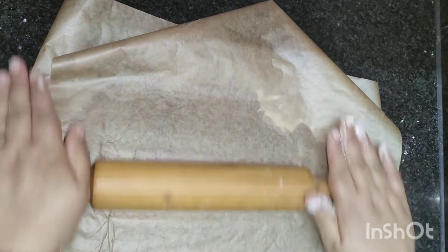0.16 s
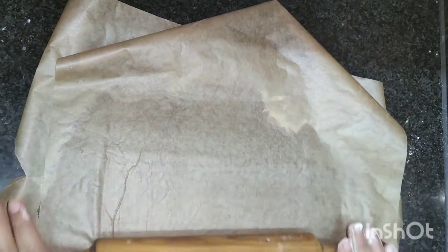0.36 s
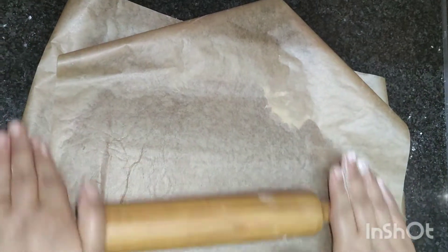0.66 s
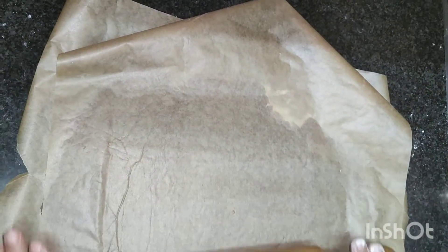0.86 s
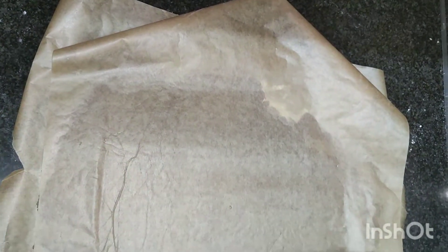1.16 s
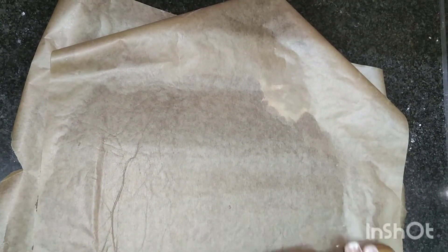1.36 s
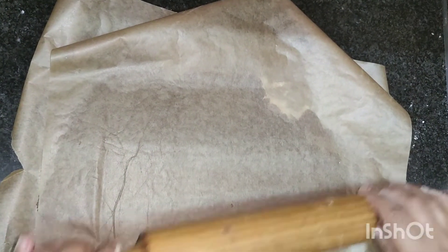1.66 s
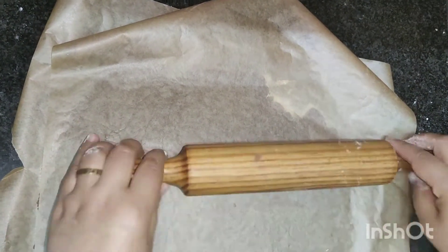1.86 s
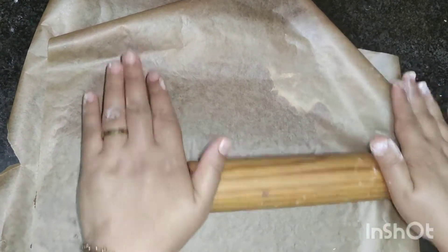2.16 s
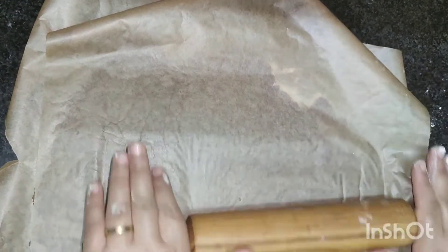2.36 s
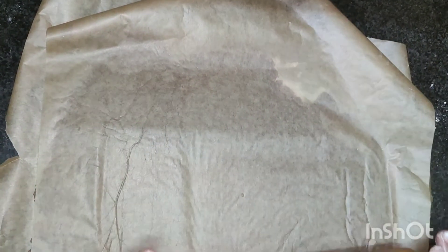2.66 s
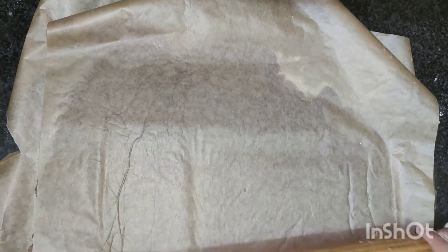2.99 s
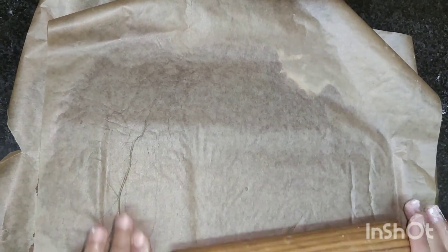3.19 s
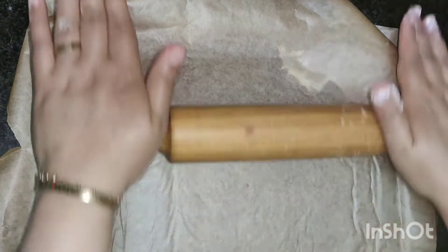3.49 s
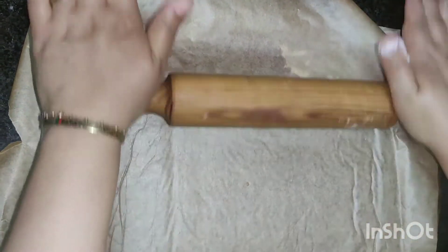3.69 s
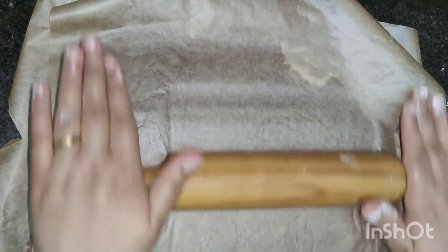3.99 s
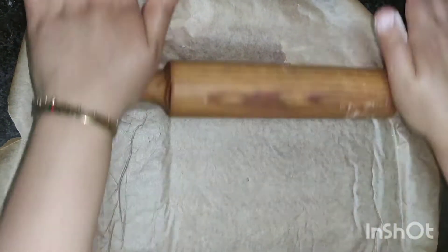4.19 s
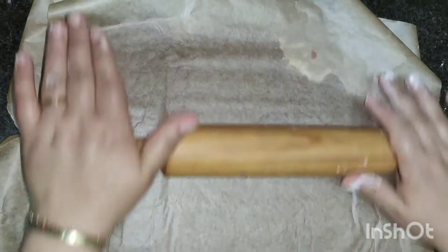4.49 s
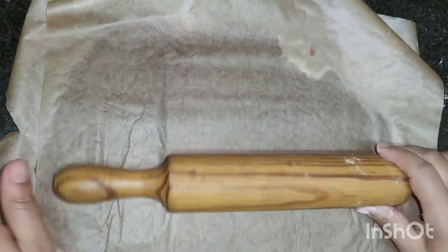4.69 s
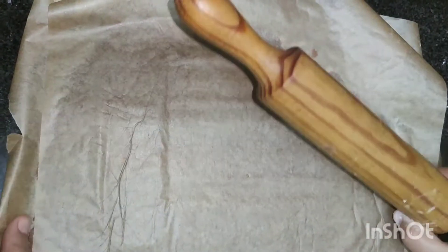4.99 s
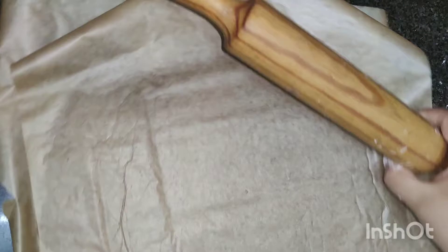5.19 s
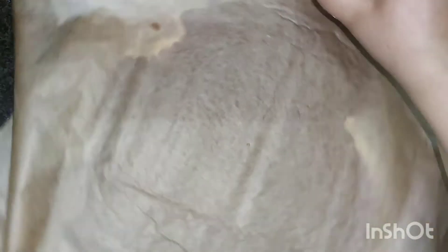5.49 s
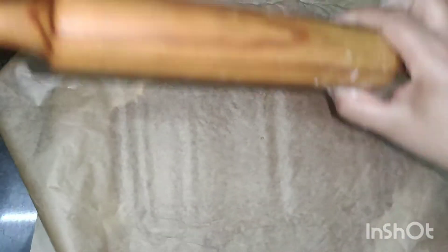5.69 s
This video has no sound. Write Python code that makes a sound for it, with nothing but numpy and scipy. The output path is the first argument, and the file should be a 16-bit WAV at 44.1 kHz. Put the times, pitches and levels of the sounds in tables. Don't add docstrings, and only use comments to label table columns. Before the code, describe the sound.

A wooden rolling pin works over baking paper on a hollow kitchen counter, heard close on a phone's stereo microphones. From 0 to 0.7 s there are only light, dry crackles and thin rustle over a faint low hum. Around 0.8-1.0 s a small cluster of crisp clicks, then sparse ticks until 1.7 s. At 1.9 s a loud sharp crack with a woody pop and dull hollow thud; a softer knock at 2.1 s. From 2.2 to 2.85 s crinkling is dense and bright, with snaps and short rips. At 3.15 s comes a strong low bump, then near quiet. From 3.45 to 4.0 s moderate, duller creasing; at 4.2-4.5 s sharp bursts, and a soft thud at 4.7 s. From 4.9 to 5.6 s the paper crackles loudest, with a hard pop near 5.45 s and a slight knock at 5.6 s, before fading to faint hum. The echo is short.

```python
import sys
import numpy as np
from scipy import signal
from scipy.fft import rfft, irfft, next_fast_len
from scipy.io import wavfile
from scipy.ndimage import uniform_filter1d, map_coordinates

SR = 44100
rng = np.random.default_rng(int(sys.argv[2]) if len(sys.argv) > 2 else 0)


def to_wav(s):
    ch = np.atleast_2d(s).T
    pcm = np.round(np.clip(ch, -1, 1) * 32767)
    wavfile.write(sys.argv[1], SR, pcm.astype(np.int16))


def gain_from_db(level_db):
    decades = np.asarray(level_db, float) / 20
    return 10 ** decades


N = 257984

# frequency in Hz, level in dB per Hz.
HUM_SPECTRUM = [(15, -21), (30, 16.5), (60, 3), (107, 8.5), (170, -0.5), (250, -9.5), (330, -2.5),
                (700, -13), (1500, -13.5), (4000, -18), (7800, -18), (8500, -27), (15500, -22),
                (16300, -67)]
HUM_DB = -61.5
# frequency in Hz, left-right likeness from 0 to 1.
HUM_COHERENCE = [(30, 0.3), (120, 0.39), (400, 0.54), (1500, 0.01)]
# frequency in Hz, decay time t60 in s.
KITCHEN_DECAY = [(200, 0.12), (1000, 0.15), (4000, 0.21), (12000, 0.051)]
# frequency in Hz, t60 in s, left-right level in dB, left lag in rad.
COUNTER_MODES = [
    (62.7, 0.24, 2, 1.05),
    (108.4, 0.27, 1.1, 0.67),
    (117.3, 0.62, 2, .63),
    (143.7, 0.2, 3, 0.71),
    (133.5, 0.051, .6, 0.74),
    (225, 0.086, -1, 0.88),
    (347, 0.14, 2, 0.8),
]
# start in seconds, peak in dB, cabinet air mode in dB, slab modes in dB.
THUD_EVENTS = [(0.663, -48.5, 0, -5), (1.8848, -30.5, 5.5, 12), (2.1387, -36, 1, 6),
               (3.1531, -27, -6, -1.5), (3.17, -31.5, -1, -22), (3.643, -60, -14, -7), (4.213, -48, 2, -8),
               (4.346, -54, -4, -12), (4.688, -35, 1, -1), (4.822, -55, -15, 13), (5.586, -45, 6, 1)]
# frequency in Hz, level in dB per Hz.
PAPER_SPECTRUM = [(120, -15), (200, -19), (290, -15), (375, -10), (660, -9), (1160, -5.5), (1830, -4.5),
                  (2400, -2), (4500, -4), (7800, -0.26), (8500, -9), (11000, -10), (15500, -5),
                  (16300, -69)]
# start in seconds, hold in seconds, crinkle in dB,
# sheet flex over crinkle in dB.
PRESS_EVENTS = [(0.0, 0.22, -54, -5), (0.329, 0.23, -59.5, -5.5), (0.819, 0.086, -51, -16),
                (0.929, 0.19, -45, -5), (1.214, 0.29, -52.5, -7.5), (1.425, 0.034, -40.5, -6.5),
                (1.536, 0.13, -42, -10), (1.886, 0.056, -47, -1.5), (2.165, 0.017, -34.5, -16),
                (2.241, 0.098, -38.5, -10), (2.355, 0.12, -37, -4.5), (2.526, 0.3, -39.5, -7),
                (2.827, 0.16, -42, -5.5), (3.169, 0.018, -51, -1), (3.26, 0.25, -55.5, -9),
                (3.464, 0.11, -43.5, -5), (3.617, 0.11, -41.5, 0), (3.74, 0.23, -42.5, -3.5),
                (4.094, 0.047, -45.5, -3.5), (4.214, 0.033, -35, -1), (4.29, 0.034, -31, -5.5),
                (4.406, 0.096, -38.5, -2), (4.555, .06, -51.5, -0.5), (4.658, 0.066, -41.5, -4.5),
                (4.84, 0.17, -42.5, -27), (4.972, 0.15, -35, -29), (5.118, 0.19, -31.5, -7),
                (5.334, .18, -31, -11), (5.552, 0.075, -30.5, -35), (5.671, 0.041, -36, -35)]
ATTACK_DB_PER_S, RELEASE_DB_PER_S = 476, 240
# start in seconds, peak in dB, pitch in Hz.
POP_EVENTS = [(0.813, -28, 1740), (1.28, -30, 1380), (1.887, -17.5, 1380), (2.115, -29, 1060),
              (2.137, -22, 1100), (2.24, -30, 1070), (2.314, -21, 1040), (2.332, -21.5, 890),
              (2.419, -26, 790), (2.529, -23.5, 1030), (2.808, -19, 1350), (2.947, -36, 1330),
              (2.979, -50, 1550), (3.153, -26.5, 1590), (3.494, -25, 1360), (3.619, -21, 1150),
              (4.165, -26.5, 1220), (4.218, -20.5, 1220), (4.291, -27, 940), (4.416, -31, 596),
              (4.905, -23, 1500), (5.18, -24, 1460), (5.263, -39, 820), (5.446, -15.5, 1270),
              (5.509, -31, 1430)]
CRACK_S, SNAP_S, NIP_S, RUN_S = (0.000828, 0.0023), (0.0012, 0.0048), (0.0024, 0.0031), (0.0055, 0.0065)
# rise in seconds, fall in seconds.
RIP_SHAPE_S = (0.00082, 0.0082)
# peak time in seconds, rms level in dB, centre in Hz.
CRACK_EVENTS = [(.1415, -30.5, 5700), (.153, -36.5, 4930), (.2283, -39.5, 4500), (.3291, -38.5, 1210),
                (.3508, -38.5, 1920), (.8545, -32.5, 3980), (.876, -33, 6100), (1.02, -35, 5360),
                (1.6, -30.5, 2010), (4.9078, -20.5, 3880), (1.8846, -15, 3540), (2.1238, -36, 3330),
                (2.302, -47, 3450), (2.311, -25, 4570), (2.3334, -24, 3420), (2.449, -20.5, 8240),
                (2.4874, -27.5, 5130), (2.5631, -20, 6900), (2.6327, -22.5, 7200), (2.6472, -22.5, 4340),
                (2.72, -27, 6230), (2.975, -27.5, 8000), (3.0483, -39.5, 3970), (3.1592, -36.5, 4000),
                (3.1758, -34.5, 1740), (3.7414, -24, 5340), (4.232, -22, 5240), (4.4447, -20, 6250),
                (4.6018, -34.5, 2310), (5.1396, -18, 7400)]
# peak time in seconds, rms level in dB, centre in Hz.
SNAP_EVENTS = [(.2879, -45, 1440), (1.2208, -42.5, 2040), (1.2386, -44, 2230), (1.3707, -39.5, 2000),
               (1.4539, -35, 5200), (1.5544, -46, 2370), (2.113, -39, 6100), (2.495, -27, 7160),
               (2.533, -35, 5100), (2.577, -27, 5040), (3.4678, -43, 2100), (3.8012, -35, 3180),
               (1.3134, -46, 7000), (4.166, -31, 4260), (4.327, -23, 5000), (4.4173, -30.5, 3100),
               (4.489, -34, 3060), (4.508, -31.5, 3660), (4.6973, -32.5, 3020), (4.7247, -29, 3330),
               (4.775, -37, 6030), (1.6286, -31.5, 3480), (5.0014, -23.5, 5700), (5.249, -25, 6300),
               (5.2825, -19.5, 4120), (5.554, -29, 3930)]
# peak time in seconds, rms level in dB, centre in Hz.
NIP_EVENTS = [(.8185, -37.5, 1250), (.8323, -38, 3070), (1.0745, -34.5, 4140), (1.2852, -38.5, 2420),
              (2.084, -54, 1270), (2.2454, -27, 4600), (2.4329, -19.5, 5000), (2.5708, -37, 3180),
              (3.514, -27.5, 2580), (3.8313, -34.5, 2490), (4.1132, -41, 2600), (4.148, -37.5, 2180),
              (4.3888, -38, 2360), (4.751, -44, 4140), (4.8885, -46, 4100), (1.3532, -45, 2080),
              (3.974, -29.5, 5500), (3.4084, -45.5, 2940), (3.5947, -34.5, 2700), (4.1947, -49, 4100),
              (5.7176, -41, 5030), (.464, -53, 3620), (1.8, -73, 3000), (5.845, -52, 2980),
              (4.9706, -24.5, 6900), (5.2282, -29, 6560), (5.509, -19, 4280)]
# peak time in seconds, rms level in dB, centre in Hz.
RUN_EVENTS = [(.0998, -40.5, 3440), (.4003, -47, 3350), (.945, -37, 4130), (.9661, -34, 3200),
              (1.1031, -41.5, 3640), (1.4708, -39, 5360), (1.5688, -40.5, 3280), (1.655, -36.5, 3500),
              (2.1438, -25, 4360), (2.755, -27, 5500), (2.7716, -24.5, 6100), (5.405, -25, 4350),
              (2.8915, -36.5, 3370), (3.2774, -47.5, 1590), (3.498, -31.5, 3120), (3.622, -35, 2140),
              (3.6708, -29, 2520), (3.8845, -34, 3140), (3.9173, -36.5, 2660), (3.9444, -38, 3700),
              (4.255, -32, 3050), (4.298, -29, 3400), (4.6803, -34, 2450), (5.1177, -29.5, 4300),
              (5.171, -26.5, 3950), (5.1893, -20.5, 4820), (5.423, -30, 3900), (5.4905, -28.5, 2960),
              (5.521, -25, 4470), (5.6056, -23.5, 4600)]
# peak time in seconds, rms level in dB, centre in Hz.
RIP_EVENTS = [
    (.8152, -41, 2210),
    (2.3105, -27.5, 5130),
    (2.5255, -23.5, 5500),
    (2.7135, -22, 5000),
    (2.8075, -22.5, 5920),
    (3.633, -25.5, 3440),
    (4.2195, -28, 3980),
]
# frequency in Hz, share of bands left out.
BAND_GAPS = [(2000, 0), (3500, .03), (7500, .04), (9000, .13), (15500, .11)]


def unit(x):
    return x / np.sqrt(np.mean(x ** 2) + 1e-20)


def along(points, hz):
    f, v = np.transpose(points)
    return np.interp(np.log(hz + 1), np.log(f + 1), v)


def filtered(x, response):
    m = next_fast_len(N + SR // 2)
    return irfft(rfft(x, m) * response(np.fft.rfftfreq(m, 1 / SR)), m)[..., :N]


def wobble(rate, s):
    return map_coordinates(rng.standard_normal(1000), [s * rate])


def hum():
    def mid_side(hz):
        angle = np.arccos(along(HUM_COHERENCE, hz)) / 2
        return gain_from_db(along(HUM_SPECTRUM, hz)) * np.array([np.cos(angle), np.sin(angle)])

    mid, side = filtered(rng.standard_normal((2, N)), mid_side)
    return gain_from_db(HUM_DB + 3.5) * unit(np.array([mid + side, mid - side]))


def kitchen(x, step=12000):
    out = np.zeros((2, N + SR))
    for a in range(0, N, step):
        hz, t, z = signal.stft(rng.standard_normal((2, SR // 2)), SR, nperseg=256)
        decay = gain_from_db(-60 * t / along(KITCHEN_DECAY, hz)[:, None])
        tail = signal.istft(z * decay, SR, nperseg=256)[1]
        wet = signal.fftconvolve(x[:, a:a + step], tail / np.linalg.norm(tail[0]), axes=1)
        first = a + 100
        out[:, first:first + wet.shape[1]] += wet
    return out[:, :N]


def load():
    start, hold, db, flex_db = np.transpose(PRESS_EVENTS)[:, :, None]
    s = np.arange(0, N / SR + 0.002, 0.001)
    early, late = np.clip(start - s, 0, 1), np.clip(s - start - hold, 0, 1)
    press_db = db - ATTACK_DB_PER_S * early - RELEASE_DB_PER_S * late
    curves = []
    for level_db in (press_db, press_db + flex_db):
        total_db = 10 * np.log10(np.sum(gain_from_db(2 * level_db), axis=0))
        curves.append(np.interp(np.arange(N) / SR, s, total_db))
    return curves


def rumble():
    def modes(f, width_hz=25):
        damping = 1j * f * width_hz
        return sum(damping / (hz * hz - f * f + damping) for hz, *rest in COUNTER_MODES)

    lumps = gain_from_db(6 * wobble(14, np.arange(N) / SR))
    force = rng.standard_normal(N) + 0.25 * rng.standard_normal((2, N))
    return gain_from_db(0.56 * load()[0] - 40.0) * unit(filtered(lumps * force, modes))


def thuds():
    out, t = np.zeros((2, N + SR)), np.arange(SR) / SR
    side = np.array([[0.5], [-0.5]])
    onsets_s = [0.048, 0.0019, 0.0021, 0.0062, 0.0052, 0.0019, 0.0027]
    for s, db, cabinet_db, slab_db in THUD_EVENTS:
        levels_db = [cabinet_db, -2.5, -17, -9, slab_db, slab_db - 15, slab_db - 25.5]
        ring = 0
        for (hz, t60, pan_db, lag), level_db, onset in zip(COUNTER_MODES, levels_db, onsets_s):
            uneven_db = 10 * t * wobble(15.0, t)
            envelope = gain_from_db(level_db + side * pan_db - 60 * t / t60 + uneven_db)
            build_up = (1 - np.exp(-t / onset)) ** 2
            ring = ring + envelope * np.sin(2 * np.pi * hz * t - side * lag) * build_up
        first = round(s * SR)
        out[:, first:first + SR] -= gain_from_db(db + 7.0) * ring
    return out[:, :N]


def facets(s, hz, rate=22, per_octave=2.423):
    return map_coordinates(rng.standard_normal((400, 40)), [s * rate, np.log2(hz / 200) * per_octave])


def clicks(s, hz, gain, pan_db, lag, cycles, size):
    out = []
    for side in (0.5, -0.5):
        start = np.clip(s + side * lag, 0, None) * SR
        at = np.ceil(start).astype(int)[:, None] + np.arange(size)
        turns = (at - start[:, None]) / SR * hz[:, None]
        wave = np.sin(2 * np.pi * turns) * np.exp(-turns / cycles)
        wave *= (gain * hz * gain_from_db(side * pan_db))[:, None]
        out.append(np.bincount(at.ravel(), wave.ravel(), N + SR)[:N])
    return filtered(np.array(out), lambda f: gain_from_db(along(PAPER_SPECTRUM, f)))


def pops(count=14):
    s, db, hz = np.transpose(POP_EVENTS)[:, :, None]
    when, sign, tune = rng.random((len(POP_EVENTS), count, 3)).transpose(2, 0, 1)
    pitch = hz * np.exp(0.19 * (tune - 0.5))
    level_db = db - 10.0 - 6.2 * when - along(PAPER_SPECTRUM, pitch)
    gain = (gain_from_db(level_db) / pitch * np.sign(sign - 0.5)).ravel()
    times = (s + 0.014 * when).ravel()
    return clicks(times, pitch.ravel(), gain, np.full(gain.shape, -0.9), 0.0003, cycles=2.04, size=400)


def snaps(count=170, cycles=3.87):
    kinds = [(CRACK_EVENTS, CRACK_S), (SNAP_EVENTS, SNAP_S), (NIP_EVENTS, NIP_S), (RUN_EVENTS, RUN_S),
             (RIP_EVENTS, RIP_SHAPE_S)]
    rows = [tuple(row) + tuple(shape) for events, shape in kinds for row in events]
    s, db, hz, rise, fall = np.transpose(rows)[:, :, None]
    when, force, sign, place = rng.random((len(s), count, 4)).transpose(2, 0, 1)
    pitch = hz * np.exp(0.714 * rng.standard_normal(when.shape))
    heard = (pitch > 1000) & (pitch < 15500)
    pitch = np.clip(pitch, 800, 15500)
    span = 2.2 * rise + 2.4 * fall
    t = span * when - 2.2 * rise
    swell_db = -4.5 * np.where(t < 0, -t / rise, t / fall) ** 1.3
    swell_db = swell_db + 1.77 * facets(s + t, pitch)
    click_energy = heard * pitch * gain_from_db(along(PAPER_SPECTRUM, pitch)) ** 2
    energy = count * cycles / 4 * np.mean(click_energy, axis=1, keepdims=True)
    force_db = -1.26 * np.log(force + 0.12)
    gain = gain_from_db(db - 0.5 + swell_db + force_db) * np.sqrt(span / energy) * heard * np.sign(sign - 0.5)
    spot = place[:, :1] - 0.5 + 0.13 * (place - 0.5)
    pan_db, lag = 3 * spot - 0.4, 1.8e-4 - 0.00028 * spot
    return clicks((s + t).ravel(), pitch.ravel(), gain.ravel(), pan_db.ravel(), lag.ravel(), cycles, size=130)


def swarm(count, low_hz, high_hz, spread_db, clump_db, cycles, size):
    when, pitch, force, place, sign = rng.random((count, 5)).T
    s = when * N / SR
    hz = low_hz * (high_hz / low_hz) ** pitch
    force_db = -spread_db * np.log(force + 0.02)
    clumps_db = clump_db * (wobble(45, s) + 0.42 * wobble(130, s))
    gain = gain_from_db(force_db + 1.44 * facets(s, hz) + clumps_db) * np.sign(sign - 0.5)
    wander = wobble(5, s) + 2 * (place - 0.5)
    x = clicks(s, hz, gain, wander, 0.00018 + 1e-4 * wander, cycles, size)
    power = np.abs(uniform_filter1d(np.mean(x ** 2, axis=0), size=3500))
    return x / np.sqrt(power + 1e-20)


def crinkle():
    fine_db, flex_db = load()
    fine = swarm(count=24000, low_hz=1500, high_hz=16000, spread_db=-6.0, clump_db=1.0, cycles=2.2, size=110)
    flex = swarm(count=6000, low_hz=300, high_hz=1770, spread_db=4.5, clump_db=5.0, cycles=0.76, size=320)
    return gain_from_db(fine_db + 0.4) * fine + gain_from_db(flex_db - 3.5) * flex


def scene():
    rustle, creases = crinkle(), snaps() + pops()
    echo = kitchen(gain_from_db(-4) * rustle + gain_from_db(-7) * creases)
    return gain_from_db(-3.0) * rustle + creases + echo + thuds() + rumble() + hum()


def thinned(x, wide=7, long=3, scatter_db=2.2, top_hz=15950):
    hz, t, z = signal.stft(x, SR, nperseg=1024)
    cells = rng.random((2, len(hz) // wide + 1, len(t) // long + 1))
    luck, coarse = cells.repeat(wide, 1).repeat(long, 2)[:, :len(hz), :len(t)]
    spells = gain_from_db(4.5 * np.clip(wobble(14, t), -3, 1.5))
    kept = luck > along(BAND_GAPS, hz)[:, None] * spells
    row_hz = hz[:, None]
    scatter = gain_from_db(scatter_db * 2.15 * (coarse - 0.5) * (row_hz > 1500))
    return signal.istft(z * kept * scatter * (row_hz < top_hz), SR, nperseg=1024)[1][:, :N]


def low_pass(x):
    return signal.sosfilt(signal.butter(12, 16990, fs=SR, output="sos"), x)


def record(dry):
    def high_pass(hz):
        ratio = 1j * hz / 45
        return ratio ** 2 / (1 + 1.3 * ratio + ratio ** 2)

    cut, top = filtered(dry, high_pass), 0.45
    mix = thinned(top * np.tanh(cut / top))
    return low_pass(mix)


dry = scene()
out = record(dry)
to_wav(out)
```